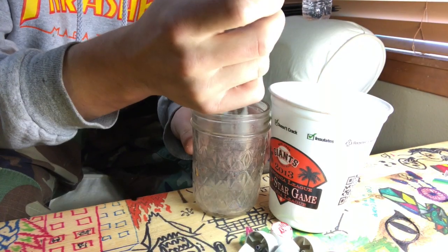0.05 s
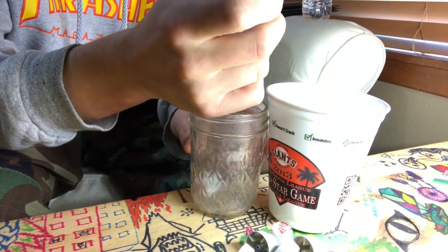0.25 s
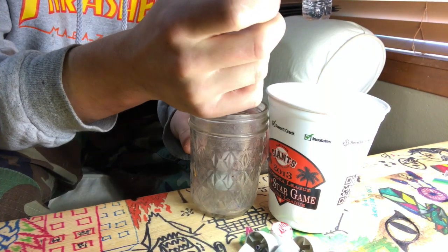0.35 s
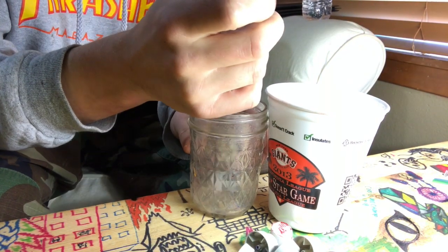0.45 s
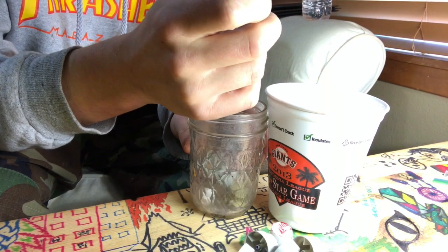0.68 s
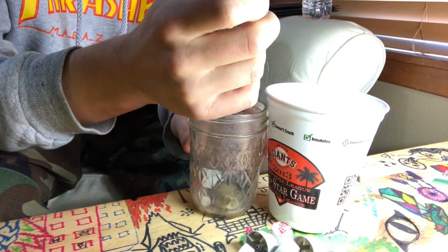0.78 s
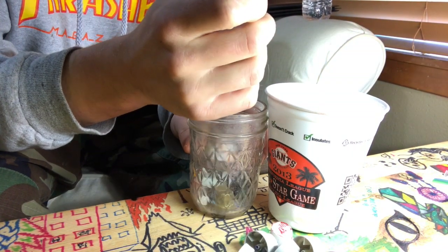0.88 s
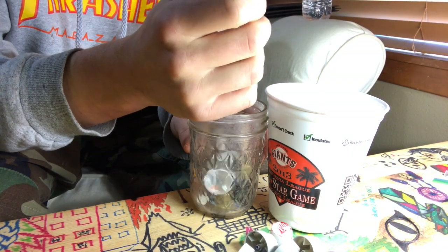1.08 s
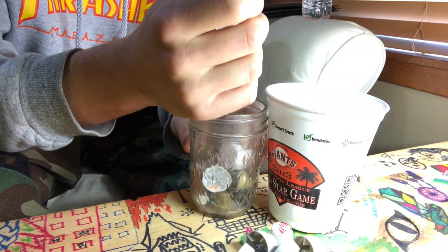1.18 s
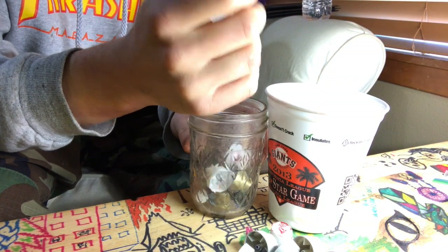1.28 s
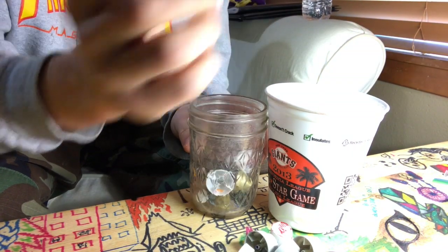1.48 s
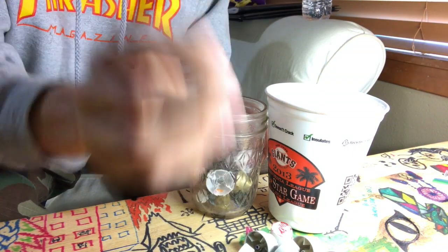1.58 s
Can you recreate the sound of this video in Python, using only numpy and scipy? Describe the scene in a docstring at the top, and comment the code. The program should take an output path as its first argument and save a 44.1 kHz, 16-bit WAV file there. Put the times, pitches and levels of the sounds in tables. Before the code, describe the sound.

Plastic caps clatter into a glass jar, first one by one, then in a brief rush of sharp clicks, soft knocks and short glass rings. They quickly come to rest, close by in a quiet room.

```python
"""At a table in a small quiet room, small plastic caps drop from a fist into a glass jar, a few singly,
then in a clattering stream. Each impact mixes noise bursts and fading tones: a thud through the jar into
the table, the hollow of the jar, and the cap's own clack and crack.
Fading sines ring the glass when a cap catches the wall. Softer impacts and tiny ticks make the pile
jostle and settle, over a short room echo and a faint rumble."""
import sys
import numpy as np
from scipy import signal
from scipy.fft import rfft, irfft
from scipy.io import wavfile

SR = 44100
rng = np.random.default_rng(int(sys.argv[2]) if len(sys.argv) > 2 else 0)


def wav_record(signal):
    """Record a signal, one row per channel, as 16-bit PCM in the file named by sys.argv[1]."""
    frames = np.transpose(np.atleast_2d(signal))
    bounded = np.clip(frames, -1, 1)
    # unit amplitude maps onto the largest positive 16-bit level
    quanta = np.round(bounded * 32767).astype(np.int16)
    wavfile.write(sys.argv[1], SR, quanta)


N = 72765
AGE = np.arange(12288) / SR  # seconds since a contact began

# t60 is the time in which a sound fades by 60 dB; OCT is the spread of a burst around its pitch, in octaves
KNOCK_HZ, KNOCK_OCT, KNOCK_T60_S = 735, 0.69, 0.013
TABLE_RISE_S = 0.0037
HOLLOW_HZ, HOLLOW_OCT, HOLLOW_T60_S = 2742, 0.34, 0.021
SAG_HZ_PER_S = 476  # once the stream starts, the pile lowers the hollow
CUT_ON_HZ = 1970  # the jar's mouth lets little out below this
CLACK_OCT, CLACK_T60_S, OVERTONE_RATIO, OVERTONE_DB = 0.07, 0.016, 1.28, -3
RATTLE_OCT = 0.32
CRACK_HZ, CRACK_OCT, CRACK_T60_S, CRACK_SPREAD_OCT = 8500, 0.36, 0.025, 0.18
SNAP_HZ, SNAP_OCT, SNAP_DB = 13900, 0.12, -9
ATTACK_S, BLOW_S = 0.00028, 0.0025  # bursts are levelled by their rms over BLOW_S
PILE_DAMP_DB_PER_S = 14  # the growing pile muffles the glass ring under the clacks
STRIKE_SPREAD_DB, TWIN_SPLIT = 2, 0.014  # twin modes lie up to this fraction away in pitch
JOSTLE_S, JOSTLE_COUNT, JOSTLE_DB, JOSTLE_SPREAD_DB = (0.65, 1.525), 105, -49, 3.5
SETTLE_S, SETTLE_DB_PER_S = 1.355, 74  # the pile comes to rest from this time on
TICK_COUNT, TICK_HZ, TICK_DB, TICK_T60_S = 280, 6300, -54, 0.012
AIR_DB, AIR_T60_S = 8, 0.12
ROOM_T60_S, ROOM_DB, ROOM_TREBLE_HZ = 0.21, -8, 6500
FLOOR_DB, FLOOR_HZ = -68, 150
TOP_HZ = 15650


def caps():
    """The falling caps, and the small rebounds of the pile between them, each with its own colour."""
    # Cap impacts, with levels before the jar's air and the room add to them.
    # Each row: start in seconds, thud in dB, hollow in dB, clack in dB, clack pitch in Hz, crack in dB.
    impacts = [ (0.1376, -76, -58.5, -65, 4300, -95), (0.2235, -32, -28, -18.5, 4850, -31.5),
               (0.2961, -32.5, -35.5, -31.5, 8900, -31), (0.3383, -43, -37.5, -31.5, 4550, -51),
               (0.3497, -44.5, -49, -39, 4600, -56), (0.3769, -44.5, -35, -42, 5900, -51),
               (0.4144, -44.5, -48, -42, 4700, -56), (0.4747, -41.5, -36.5, -27.5, 4700, -35.5),
               (0.4965, -46, -45, -39.5, 4700, -55), (0.5709, -43, -48, -43, 8500, -50),
               (0.5844, -51, -39.5, -38, 4400, -44), (0.5914, -28, -29.5, -63, 5200, -36),
               (0.6141, -69, -33, -32.5, 5600, -54), (0.6246, -67, -34, -30.5, 4600, -35),
               (0.6304, -30.5, -23.5, -23, 4600, -54.5), (.6380, -52, -37, -58, 4300, -41),
               (0.6768, -30.5, -32, -32, 5900, -36.5), (0.7608, -41, -27.5, -31.5, 4600, -35.5),
               (0.7684, -40.5, -31, -37.5, 4600, -37.5), (.8200, -46.5, -31, -33.5, 4600, -42.5),
               (0.825, -35, -27, -27, 4550, -38), (0.8906, -36, -32, -33.5, 5800, -41),
               (0.8976, -43.5, -34, -38, 4600, -48), (0.9086, -60, -34, -59, 4600, -61),
               (0.9427, -44, -34, -47, 4300, -68), (0.9499, -40, -37, -34, 5100, -42.5),
               (0.993, -33, -35.5, -36, 4700, -47), (1.0413, -68, -41, -32, 4600, -45),
               (1.0580, -38, -33.5, -51.5, 4600, -71.5), (1.0616, -59, -37.5, -36, 5000, -67.5),
               (1.104, -42.5, -30, -60.5, 4500, -58), (1.1327, -34.5, -27.5, -34, 5600, -35.5),
               (1.151, -32, -20, -28, 4110, -35), (1.156, -45, -26.5, -31.5, 5920, -30),
               (1.2171, -41, -42, -31.5, 5150, -49), (1.2419, -35, -54, -29, 4000, -49.5),
               (1.2517, -54, -39.5, -31.5, 5280, -51), (1.274, -38.5, -37, -38.5, 4480, -63),
               (1.3264, -50, -29.5, -33.5, 5600, -62), (1.3438, -32, -31, -31, 5400, -32),
               (1.3493, -40, -51.5, -29.5, 3900, -43), (1.418, -47.5, -40, -44.5, 4300, -65),
               (1.4464, -46, -41, -48, 4480, -71), (1.4921, -51, -43, -67.5, 4300, -85.5),
               (1.5127, -56.5, -50, -53, 3580, -83)]
    out = np.zeros(N)
    for row in impacts:
        add(out, row[0], impact(*row))

    slots = np.linspace(*JOSTLE_S, JOSTLE_COUNT)
    slot_gap = slots[1] - slots[0]
    for slot, (late, size, low, high, pitch) in zip(slots, scatter(size=(JOSTLE_COUNT, 5))):
        start = slot + late * slot_gap
        db = JOSTLE_DB + JOSTLE_SPREAD_DB * size + settling(slot)
        bright_db = db + settling(slot)  # bright contacts fade twice as fast
        rebound = impact(
            start,
            thud_db=db - 3,
            hollow_db=db + JOSTLE_SPREAD_DB * low,
            clack_db=bright_db + JOSTLE_SPREAD_DB * high,
            clack_hz=5600 * np.exp(0.4 * pitch),
            crack_db=bright_db - 27.5)
        add(out, start, rebound)
    return out


def impact(start, thud_db, hollow_db, clack_db, clack_hz, crack_db):
    """One cap lands: thud, hollow of the jar, the cap's clack with a little glass, and a bright crack."""
    # Glass ring that every clack stirs; levels are relative to the clack, before the pile muffles them.
    # Each row: pitch in Hz, level in dB, t60 in seconds.
    base_modes = [(3420, -17, .22), (10670, -23, .11)]
    glass = amp(-PILE_DAMP_DB_PER_S * start) * ring(base_modes)
    out = amp(thud_db) * thud()
    out += amp(hollow_db) * hollow(start)
    out += amp(clack_db) * (clack(clack_hz) + glass)
    out += amp(crack_db) * crack()
    return out


def thud():
    """The jar's bottom knocks at once; the table under it swells a moment later."""
    # Jar on the table; levels are relative to each other.
    # Each row: pitch in Hz, level in dB, t60 in seconds.
    table_modes = [(158.6, -6, 0.16), (212.7, -1, 0.12), (394, 4, 0.058), (734.5, 6.5, 0.034)]
    swell = 1 - np.exp(-(AGE / TABLE_RISE_S) ** 2)
    table = ring(table_modes) * swell
    knock = burst(KNOCK_HZ, KNOCK_OCT, KNOCK_T60_S)
    return blow(table / 2 + knock)


def hollow(start):
    """The air in the jar: a broad cluster of resonances that sinks in pitch as the pile grows."""
    sag = SAG_HZ_PER_S * max(start - JOSTLE_S[0], 0)
    air = burst(HOLLOW_HZ - sag, HOLLOW_OCT, HOLLOW_T60_S)
    mouth = signal.butter(6, CUT_ON_HZ, "high", fs=SR, output="sos")
    return blow(signal.sosfilt(mouth, air))


def clack(hz):
    """A plastic cap: two short resonances over a broader rattle."""
    body = burst(hz, CLACK_OCT, CLACK_T60_S)
    overtone = amp(OVERTONE_DB) * burst(hz * OVERTONE_RATIO, CLACK_OCT, CLACK_T60_S)
    rattle = burst(hz, RATTLE_OCT, CLACK_T60_S) / 2
    return blow(body + overtone + rattle)


def crack():
    """A bright noise burst whose pitch varies from cap to cap, with a softer, still higher snap."""
    hz = CRACK_HZ * 2 ** (CRACK_SPREAD_OCT * rng.standard_normal())
    snap = amp(SNAP_DB) * burst(SNAP_HZ, SNAP_OCT, CRACK_T60_S)
    return burst(hz, CRACK_OCT, CRACK_T60_S) + snap


def jar_wall():
    """Glass rings on when a cap catches its side; each spot favours higher or lower overtones.
    The jar is not quite round, so every mode beats against a shorter-lived twin."""
    # Caps catching the glass wall; the tilt raises the top overtone and lowers the first by as much.
    # Each row: start in seconds, fundamental in dB, overtones in dB, tilt in dB.
    chimes = [(0.378, -40, -44, -9.5), (0.6149, -41, -32, -0.5), (0.957, -36.5, -56, -8),
              (1.0256, -42, -40, -5), (1.041, -34.5, -60.5, 9), (1.1537, -33, -31.5, -5.5),
              (1.3093, -41, -55, -12), (1.351, -29.5, -28.5, -1)]
    # Glass wall, fundamental first; levels are added to those of each chime.
    # Each row: pitch in Hz, level in dB, t60 in seconds.
    wall_modes = [(2802, 0, .21), (7580, -2, .07), (8465, -7, .085), (9604, -2, .085)]
    out = np.zeros(N)
    for start, low_db, high_db, tilt_db in chimes:
        modes = [(hz, low_db + db, t60) for hz, db, t60 in wall_modes[:1]]
        for (hz, db, t60), lean in zip(wall_modes[1:], (-tilt_db, 0, tilt_db)):
            overtone_db = high_db + db + lean + STRIKE_SPREAD_DB * scatter()
            modes.append((hz, overtone_db, t60))
        twins = [(hz * (1 + TWIN_SPLIT * scatter()), db, t60 / 2) for hz, db, t60 in modes]
        add(out, start, ring(modes) + ring(twins) / np.sqrt(2))
    return out


def ticks():
    """Rims graze each other: tiny dry ticks at uneven moments, up to an octave either way in pitch."""
    out = np.zeros(N)
    for when, size, pitch in scatter(size=(TICK_COUNT, 3)):
        start = np.interp(when, (-1, 1), JOSTLE_S)
        db = TICK_DB + 2 * JOSTLE_SPREAD_DB * size + 2 * settling(start)
        add(out, start, amp(db) * burst(TICK_HZ * 2 ** pitch, RATTLE_OCT / 2, TICK_T60_S))
    return out


def settling(start):
    """Change of level in dB, zero at first, then ever lower as the pile comes to rest."""
    return -SETTLE_DB_PER_S * max(start - SETTLE_S, 0)


def jar_air(x):
    """Every contact feeds a narrow resonance of the air, which glides as caps fall through it."""
    # Air tone of the jar, bent by the falling caps. Each row: time in seconds, pitch in Hz.
    air_tone = [(.56, 3420), (.615, 3120), (.73, 2900), (.765, 3170), (.96, 2840)]
    hz = np.interp(np.arange(N) / SR, *np.transpose(air_tone))
    turn = np.exp(2j * np.pi * np.cumsum(hz) / SR)
    keep = np.exp(-np.log(1000) / (AIR_T60_S * SR))  # share of the ringing left after one sample
    # Shift the moving pitch down to zero, let it ring there, then shift it back up.
    ringing = signal.lfilter([1 - keep], [1, -keep], x / turn)
    return x + 2 * amp(AIR_DB) * np.real(turn * ringing)


def room(x):
    """A short, slightly dull tail from the table and nearby walls, made of fading noise."""
    dull = signal.butter(1, ROOM_TREBLE_HZ, fs=SR)
    tail = signal.lfilter(*dull, rng.standard_normal(len(AGE)))
    decay = fade(ROOM_T60_S)
    tail *= decay * (AGE > BLOW_S) / np.sqrt(np.sum(decay ** 2))
    return x + amp(ROOM_DB) * signal.fftconvolve(x, tail)[:N]


def room_tone():
    """Faint low rumble that thins to a hiss: noise that weakens towards the treble."""
    keep = np.exp(-2 * np.pi * FLOOR_HZ / SR)
    x = signal.lfilter([1], [1, -keep], rng.standard_normal(N))
    return amp(FLOOR_DB) * x / x.std()


def burst(hz, octaves, t60):
    """A dense cluster of short resonances around hz: fading filtered noise, new at every contact."""
    bins_hz = np.maximum(np.fft.rfftfreq(len(AGE), 1 / SR), 1)
    off = np.log2(bins_hz / hz) / octaves  # distance from the centre, in burst widths
    shape = 1 / np.sqrt(1 + off ** 4 * (1 + off ** 2))
    noise = irfft(rfft(rng.standard_normal(len(AGE))) * shape, len(AGE))
    return blow(noise * fade(t60))


def ring(modes):
    """Decaying sines of a struck object, one for each mode."""
    out = np.zeros(len(AGE))
    for hz, db, t60 in modes:
        out += np.sqrt(2) * amp(db) * np.sin(2 * np.pi * hz * AGE) * fade(t60)
    return out


def fade(t60):
    """Exponential decay after a quick attack."""
    return np.exp(-np.log(1000) * AGE / t60) * (1 - np.exp(-AGE / ATTACK_S))


def blow(x):
    """Scale to unit rms over the first moments."""
    return x / np.sqrt(np.mean(x[:int(BLOW_S * SR)] ** 2))


def amp(db):
    """Decibels to gain."""
    return 10 ** (np.asarray(db) / 20)


def scatter(size=None):
    """Random numbers from -1 to 1, all equally likely."""
    return rng.uniform(-1, 1, size)


def add(out, start, x):
    """Mix x in from the given time in seconds."""
    i = int(start * SR)
    out[i:i + len(x)] += x[:max(N - i, 0)]


def scene():
    """Caps and ringing glass in the quiet room."""
    contacts = jar_air(caps() + ticks())
    return (room(contacts) + jar_wall() + room_tone())[None]


def record(dry):
    """The microphone thins the bass and cuts the top."""
    thin = signal.sosfilt(signal.butter(1, 60, "high", fs=SR, output="sos"), dry)
    return signal.sosfilt(signal.ellip(8, 0.2, 70, TOP_HZ, fs=SR, output="sos"), thin)


dry = scene()
out = record(dry)
wav_record(out)
```